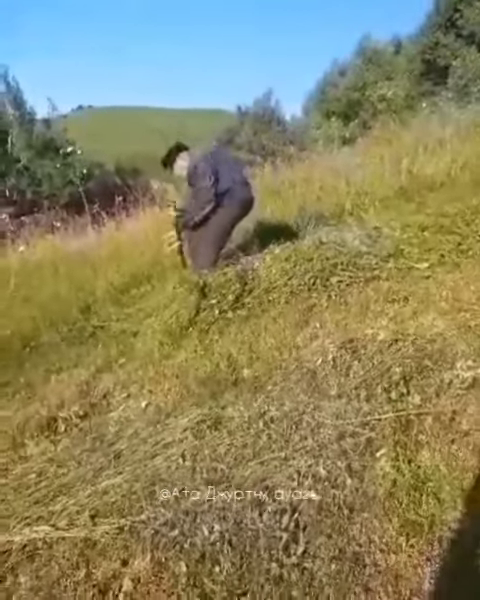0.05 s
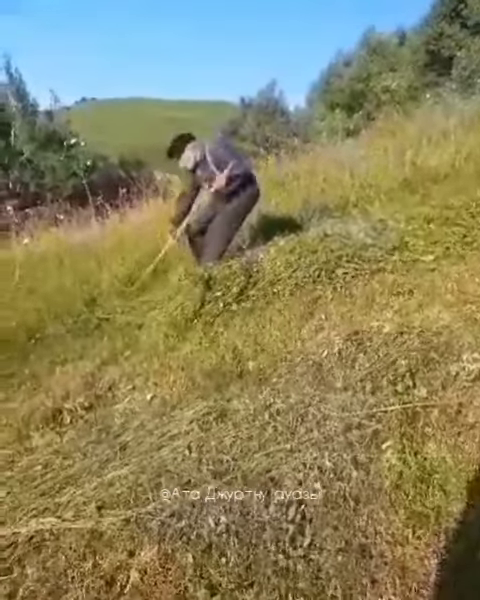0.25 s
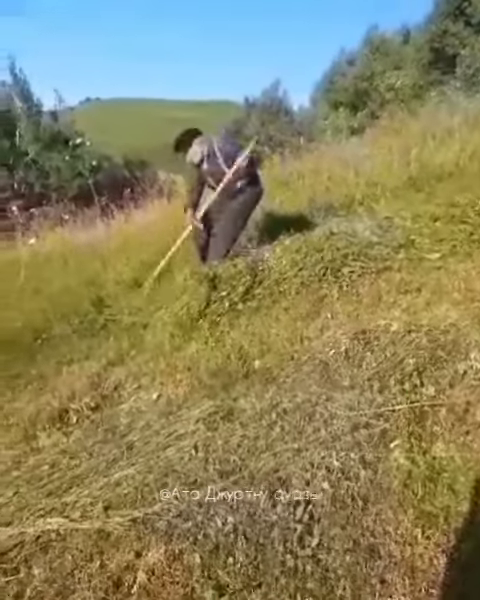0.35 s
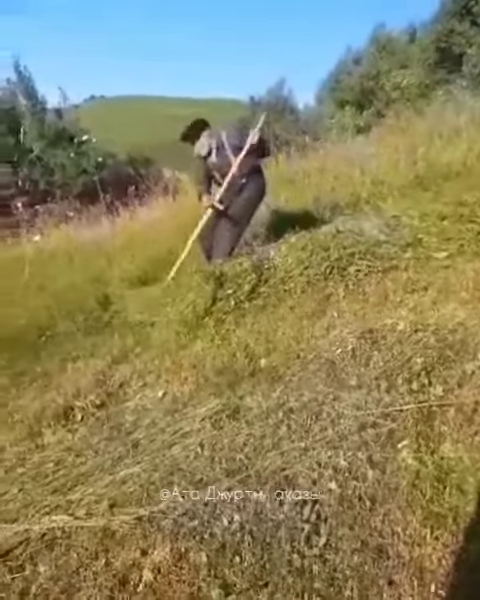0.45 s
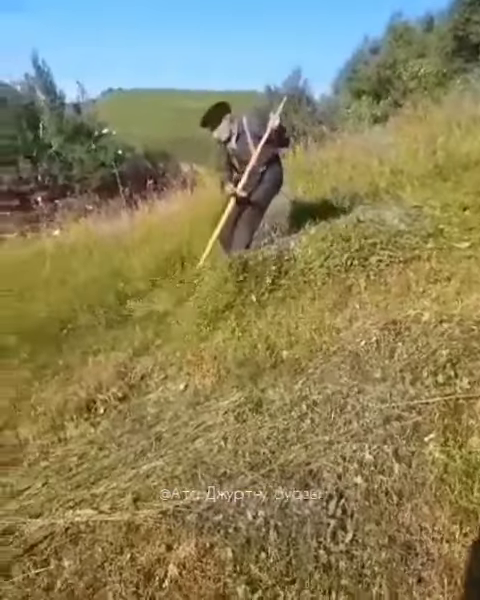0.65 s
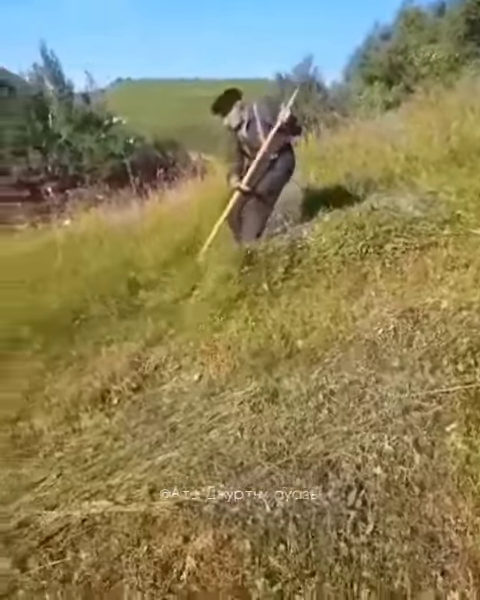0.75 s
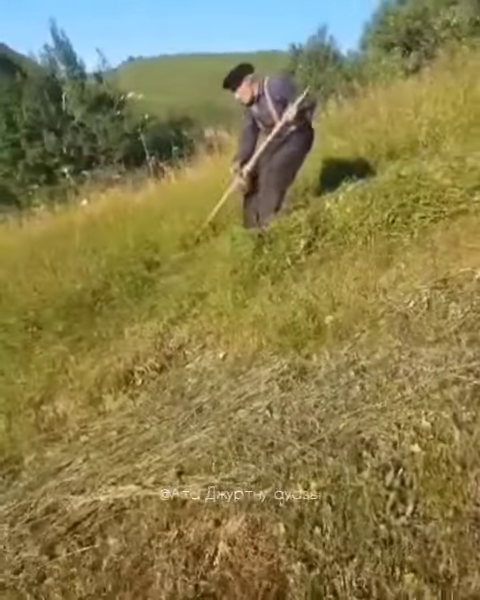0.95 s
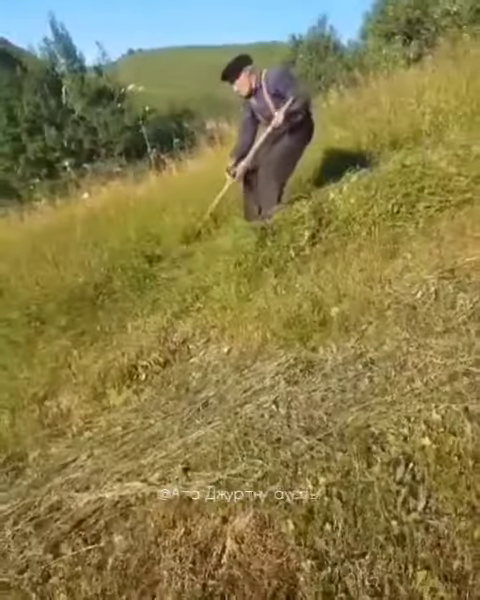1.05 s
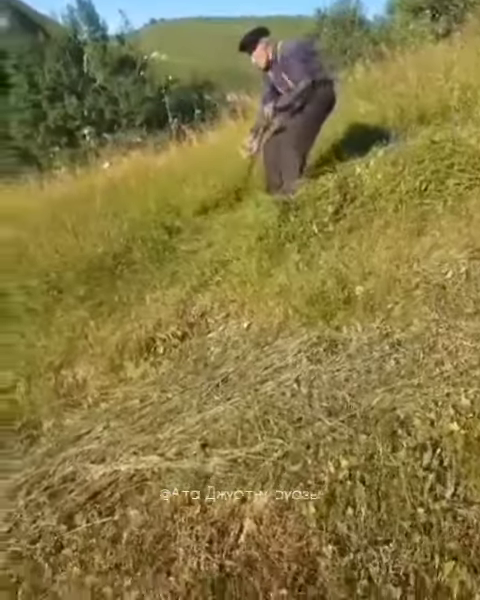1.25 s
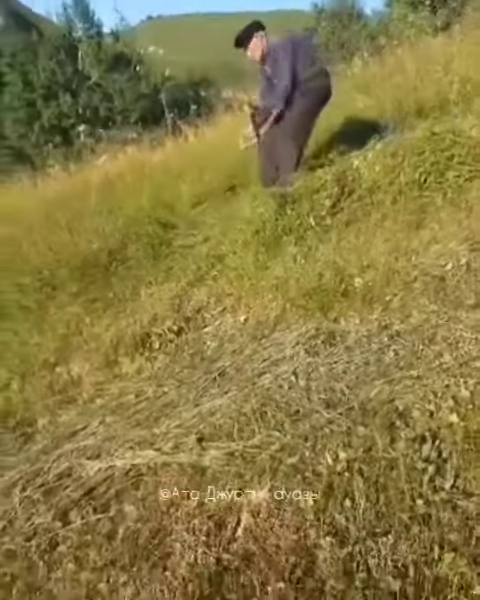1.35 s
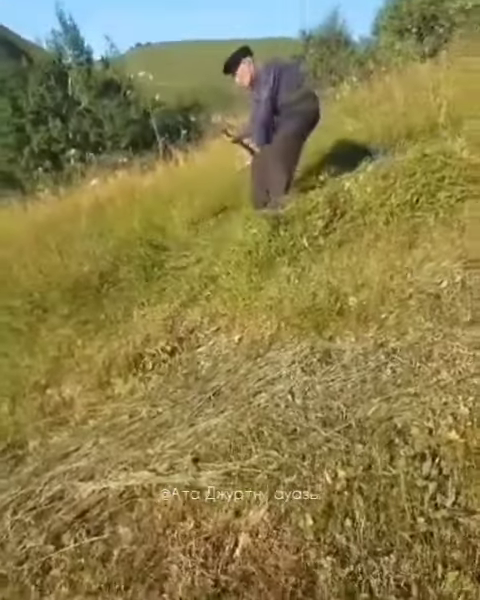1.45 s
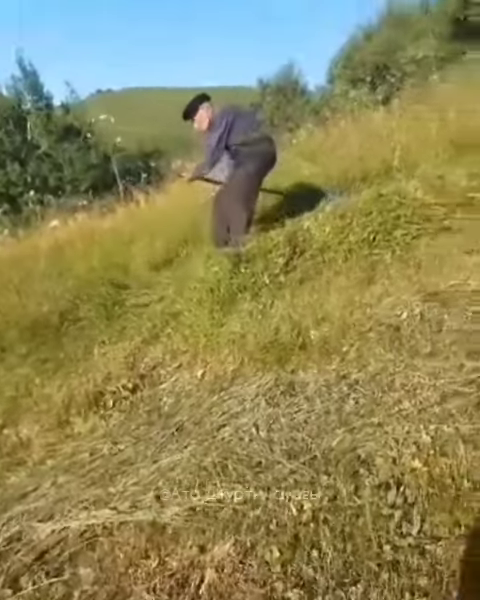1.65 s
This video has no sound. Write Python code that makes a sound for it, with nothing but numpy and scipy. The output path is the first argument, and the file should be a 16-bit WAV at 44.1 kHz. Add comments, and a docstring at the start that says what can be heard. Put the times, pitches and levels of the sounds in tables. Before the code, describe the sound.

A scythe swishes once through tall grass, with wind buffeting the microphone.

```python
"""One scythe stroke through tall grass, heard from a stereo microphone on a breezy hillside.
The blade snaps hundreds of stalks, rings faintly with them and slides back over the stubble.
Nearer by, mostly to the right, dry grass rustles, stems crack and a foot shifts in the straw.
Gusts buffet the microphone, mostly its right port, over the far rush of the valley and a faint hum."""
import sys
import numpy as np
from scipy import signal
from scipy.fft import rfft, irfft
from scipy.io import wavfile
from scipy.ndimage import uniform_filter1d, map_coordinates

SR = 44100
rng = np.random.default_rng(int(sys.argv[2]) if len(sys.argv) > 2 else 0)


def generate_wav(sig):
    """Save sig (samples, or channels by samples) to the path in sys.argv[1] as 16-bit PCM at SR."""
    pcm = np.round(np.clip(np.atleast_2d(sig).T, -1, 1) * 32767).astype(np.int16)
    wavfile.write(sys.argv[1], SR, pcm)


N = 74970
TIME = np.arange(N) / SR
BIN_HZ = np.fft.rfftfreq(N, 1 / SR)


def from_db(db):
    """Decibels to gain."""
    return 10 ** (np.asarray(db) / 20)


def rms_one(x):
    """Scale to unit power."""
    return x / np.sqrt(np.mean(x ** 2) + 1e-20)


def in_time(rows):
    """Each column of a curve at every sample."""
    times, *columns = np.transpose(rows)
    return [np.interp(TIME, times, column) for column in columns]


def per_bin(points):
    """A table over log frequency, read at every spectral bin."""
    hz, value = np.transpose(points)
    return np.interp(np.log(BIN_HZ + 1), np.log(hz), value)


def colour(x, spectrum):
    """Give a signal a smooth spectrum; unit power."""
    return rms_one(irfft(rfft(x) * from_db(per_bin(spectrum)), N))


def pan(db):
    """Left and right gains of constant power; positive dB is to the left."""
    gains = from_db(np.array([[.5], [-.5]]) * db)
    return gains / np.sqrt(np.mean(gains ** 2, axis=0))


def drift(hz):
    """A random wander, mostly slower than hz; unit spread."""
    return rms_one(irfft(rfft(rng.standard_normal(N)) / (1 + (BIN_HZ / hz) ** 2), N))


def swell(s, width_s):
    """A bell-shaped rise and fall."""
    return np.exp(-.5 * ((TIME - s) / width_s) ** 2)


def grains(per_s, spread_db, hiss_db):
    """Tiny fractures of uneven size over the hiss of rubbing leaves; two unrelated signals."""
    sizes = from_db(spread_db * np.minimum(rng.exponential(1, N), 4))
    clicks = (rng.random(N) < per_s / SR) * sizes * rng.standard_normal((2, N))
    return rms_one(rms_one(clicks) + from_db(hiss_db) * rng.standard_normal((2, N)))


def resonate(x, hz, width_hz):
    """One resonance; unit power."""
    r = np.exp(-np.pi * width_hz / SR)
    return rms_one(signal.lfilter([1, 0, -1], [1, -2 * r * np.cos(2 * np.pi * hz / SR), r * r], x))


# how alike the microphone's two ports hear airborne sound: f/Hz, likeness (0-1)
PORT_LIKENESS = [(60, 0.62), (300, 0.82), (600, 1), (1300, 0.32), (2000, 0.43), (2700, 0.34), (4400, 0.8),
                 (5800, 0.67), (7500, 0.17), (10000, 0.11), (12100, 0.36), (14500, 0.32)]
# how far the left port leads: f/Hz, phase/rad
LEFT_LEAD = [(300, 0.046), (700, 0.94), (1200, 0.91), (2000, 0.062), (3100, 3.4), (4400, 4.14),
             (5800, 5.44), (6600, 6.6), (9300, 14.8), (12100, 19.6), (13000, 17.3), (15500, 25.7)]

def at_ports(pair):
    """Two unrelated signals become left and right, as alike and out of step as the ports hear them."""
    alike = np.clip(per_bin(PORT_LIKENESS), 0, 1)
    mid, side = rfft(pair)
    sign = np.array([[1], [-1]])
    ports = np.sqrt((1 + alike) / 2) * mid + np.sqrt((1 - alike) / 2) * side * sign
    return irfft(ports * np.exp(.5j * sign * per_bin(LEFT_LEAD)), N)


# spectrum of the valley from the hillside: f/Hz, level/dB
VALLEY_SPECTRUM = [(30, -30), (100, -2), (200, -27.5), (300, -6), (400, -2.5), (600, -5), (800, -5),
                   (1100, -10.5), (1700, -15), (4000, -18), (15000, -35)]
# its rise and fall: t/s, level/dB
VALLEY_LEVEL = [(0, -43), (.15, -40), (.6, -39), (1.0, -40.5), (1.18, -36), (1.26, -39), (1.305, -33),
                (1.36, -37.5), (1.7, -40.5)]

def valley():
    """Far off, a dull rush of air in the trees."""
    air = at_ports(rng.standard_normal((2, N)))
    return from_db(in_time(VALLEY_LEVEL)[0]) * colour(air, VALLEY_SPECTRUM)


# swells of the hum's lowest band: t/s, level/dB
HUM_LEVEL = [(0, -88), (.35, -41.5), (.55, -38.5), (1.0, -66), (1.19, -38.5), (1.45, -44), (1.6, -42),
             (1.7, -50)]
# faint steady bands above it: f/Hz, width/Hz, level/dB
HUM_BANDS = [(640, 35, -55), (727, 33, -51), (821, 23, -49), (972.5, 26, -57.5)]

def hum():
    """A faint hum, dead centre: narrow, wavering bands of noise."""
    upper = sum(from_db(db) * resonate(rng.standard_normal(N), hz, width) for hz, width, db in HUM_BANDS)
    low = resonate(rng.standard_normal(N), hz=387, width_hz=52)
    return from_db(in_time(HUM_LEVEL)[0]) * low + upper


# wind on the exposed right port: t/s, level/dB
RIGHT_GUSTS = [(0, -61), (.04, -29.5), (.085, -51), (.12, -29), (.175, -52), (.22, -35), (.25, -43),
               (.275, -25), (.305, -35), (.355, -33), (.39, -40), (.425, -24.5), (.49, -34.5), (.52, -18.5),
               (.585, -16), (.66, -14.5), (.68, -32), (.712, -24), (.735, -14.5), (.81, -12), (.91, -15.5),
               (.98, -9.5), (1.025, -14.5), (1.066, -5), (1.11, -12.5), (1.19, -18), (1.24, -26.5),
               (1.26, -13), (1.32, -14), (1.375, -23.5), (1.41, -20), (1.46, -27.5), (1.55, -35),
               (1.605, -26.5), (1.64, -38), (1.7, -32)]
# wind on the sheltered left port: t/s, level/dB
LEFT_GUSTS = [(0, -65), (.2, -53), (.35, -21.5), (.42, -41), (.75, -55), (.86, -25), (.95, -39),
              (1.06, -47), (1.35, -46), (1.5, -62), (1.7, -54)]
# the flow breaks off for an instant at both ports: t/s, depth/dB
LULLS = [(0.548, 9), (.632, 1), (0.79, 16), (.908, 4), (1.022, 3.5), (1.097, 12), (1.176, 8), (1.306, 11),
         (1.469, 8)]
# spectrum of eddies passing at EDDY_REFERENCE_HZ: f/Hz, level/dB
EDDY_SPECTRUM = [(20, -50), (35, -53), (50, -16), (70, -2), (112, -0.5), (140, -14.5), (175, -18.5),
                 (220, -29.5), (300, -35), (600, -67), (2000, -81)]
# how fast the eddies pass the ports: t/s, f/Hz
EDDY_RATE = [(0, 83.2), (.2, 74.8), (.34, 88.6), (.45, 68.7), (.54, 92.9), (.8, 93.54), (.97, 98.66),
             (1.065, 111.9), (1.17, 92.15), (1.28, 91.1), (1.4, 71.8), (1.6, 89.6), (1.7, 71)]
# spectrum of the fine turbulence: f/Hz, level/dB
TURBULENCE_SPECTRUM = [(100, 2), (190, 1.5), (280, 3), (420, -14), (1000, -29.5), (3000, -62)]
EDDY_REFERENCE_HZ, EDDY_EVENNESS = 94.95, 0.7   # an evenness of 1 would level out the lumps
TURBULENCE_DB, TURBULENCE_GROWTH = -17.5, 1.63   # at a full-scale gust; dB per dB of wind

def buffet(gusts):
    """Eddies right on one port: a low flutter that breaks into finer turbulence in strong gusts."""
    level_db = in_time(gusts)[0] - sum(depth_db * swell(s, width_s=0.0055) for s, depth_db in LULLS)
    eddies = signal.hilbert(colour(rng.standard_normal(N), EDDY_SPECTRUM))
    strength = np.sqrt(uniform_filter1d(np.abs(eddies) ** 2, size=700))
    evened = rms_one(eddies.real / strength ** EDDY_EVENNESS)
    travel = np.cumsum(in_time(EDDY_RATE)[0] / EDDY_REFERENCE_HZ)
    flutter = map_coordinates(evened, [travel], order=1, mode="mirror")
    turbulence = colour(rng.standard_normal(N), TURBULENCE_SPECTRUM)
    return from_db(level_db) * flutter + from_db(TURBULENCE_DB + TURBULENCE_GROWTH * level_db) * turbulence


# course of the nearby rustle: t/s, relative level/dB, left-right/dB
RUSTLE = [(0, -51.5, 5), (.09, -44.5, 2), (.14, -37.5, 6), (.2, -42.5, 0), (.45, -39.5, 6.5),
          (.575, -40.5, -11), (.63, -45, -14), (.71, -43.5, -3.5), (.82, -40, 0), (.97, -37, 1),
          (1.06, -40, 0), (1.14, -43.5, -5.5), (1.22, -49, -7), (1.25, -43, -5), (1.32, -44.5, -3),
          (1.41, -44.5, -5.5), (1.49, -42.5, -8), (1.7, -42.5, -11)]
# its balance between the ports: f/Hz, left-right/dB
RUSTLE_BALANCE = [(1000, -6), (3000, -6), (8000, 3), (11000, 1.5), (14000, -5)]
# spectrum of the nearby rustle as heard, with a dip near 7 kHz: f/Hz, level/dB
RUSTLE_SPECTRUM = [(150, 7), (600, 8), (1500, 0.5), (2400, 0.5), (4200, 5.5), (5500, 1), (7200, -0.5),
                   (8700, 6), (10200, 1.5), (12700, 4.5), (15200, 3), (15800, -1)]
RUSTLE_GAIN_DB, RUSTLE_FLUTTER_DB = 6, 1

def dry_grass():
    """Near the microphone, tiny fractures in dry grass make a fine crackling rustle."""
    level_db, side_db = in_time(RUSTLE)
    crackle = at_ports(grains(per_s=1300, spread_db=4.5, hiss_db=9))
    crackle = irfft(rfft(crackle) * pan(per_bin(RUSTLE_BALANCE)), N)
    gain = from_db(RUSTLE_GAIN_DB + level_db + RUSTLE_FLUTTER_DB * drift(hz=24.8))
    return gain * pan(side_db) * colour(crackle, RUSTLE_SPECTRUM)


# single stems break: t/s, level/dB, left-right/dB
CRACKS = [(1.0432, -23.5, -7), (1.2361, -32, -8), (1.568, -18.5, -8), (1.5713, -23.5, -19)]
# spectrum of a crack: f/Hz, level/dB
CRACK_SPECTRUM = [(500, -7), (2500, -9), (4500, -2.5), (6000, -6), (9000, 0.5), (14000, 0)]

def stem_cracks(decay_s=0.0015):
    """Nearby on the right, each breaking stem is a bright burst that dies at once."""
    bursts = sum(from_db(db) * pan(side_db) * (TIME >= s) * np.exp(-np.abs(TIME - s) / decay_s)
                 for s, db, side_db in CRACKS)
    return bursts * colour(rng.standard_normal((2, N)), CRACK_SPECTRUM)


# crunches underfoot: t/s, width/s, level/dB, left-right/dB, rasp f/Hz, rasp re straw/dB
CRUNCHES = [(1.515, 0.0096, -36.5, -4, 4200, 2.5), (1.548, 0.0076, -39.5, -3, 2227, -8),
            (1.582, 0.0035, -42, -10, 1564, 0), (1.61, 0.03, -36.5, -9, 4250, -10),
            (1.688, 0.014, -40.5, -12, 3546, -16)]
# spectrum of the crunches as heard: f/Hz, level/dB
STRAW_SPECTRUM = [(200, -4), (600, 5), (1600, 8.5), (2900, 7), (4200, -4.5), (6000, 4.5), (8300, 6.5),
                  (10300, 0), (13000, 11), (15500, -5)]
STRAW_LAG_S, STRAW_DIRECT = 0.00048, 0.81   # at the left port: delay; amplitude share arriving directly

def foot_in_straw():
    """Close by on the right, straw crackles under a shifting foot; each crunch rasps at its own pitch."""
    right, scattered = grains(per_s=2500, spread_db=1, hiss_db=7)
    delayed = np.roll(right, round(STRAW_LAG_S * SR))
    left = STRAW_DIRECT * delayed + np.sqrt(1 - STRAW_DIRECT ** 2) * scattered
    straw = colour(np.array([left, right]), STRAW_SPECTRUM)
    out = 0
    for s, width_s, db, side_db, hz, rasp_db in CRUNCHES:
        rasp = from_db(rasp_db) * resonate(straw, hz, width_hz=820)
        out += from_db(db) * pan(side_db) * swell(s, width_s) * (straw + rasp)
    return out


# the blade drags over the stubble: t/s, level/dB
DRAG_LEVEL = [(0, -76), (.42, -43), (.54, -46), (.66, -41), (.75, -45), (.97, -43), (1.21, -49), (1.3, -42),
              (1.39, -46.5), (1.48, -48), (1.7, -57)]

def backswing():
    """Well to the right, the blade, damped by the stubble, scrapes softly on its way back."""
    scrape = resonate(rng.standard_normal((2, N)), hz=2404, width_hz=310)
    return from_db(in_time(DRAG_LEVEL)[0]) * pan(db=-13) * scrape


# tufts give way: t/s, width/s, level/dB, f/Hz
THUDS = [(0.14, 0.018, -40.5, 850), (0.226, .012, -36.5, 950), (0.255, 0.012, -37.5, 396),
         (0.278, 0.012, -33, 760), (0.309, 0.017, -33.5, 223), (0.357, 0.01, -29.5, 720),
         (0.4, 0.014, -33.5, 850)]

def swath(width_oct=0.61):
    """The swath is pushed aside, each tuft with a soft thud at its own pitch."""
    octaves = np.log2(BIN_HZ + 1)
    noise = rfft(at_ports(rng.standard_normal((2, N))))
    out = 0
    for s, width_s, db, hz in THUDS:
        band = np.exp(-.5 * ((octaves - np.log2(hz)) / width_oct) ** 2)
        out += from_db(db) * swell(s, width_s) * rms_one(irfft(noise * band, N))
    return out


# the blade's ringing modes: f/Hz, width/Hz, relative level/dB
BLADE_MODES = [(1671, 24, -15), (2015, 22, -9), (2038, 12, -7), (2277, 36, 0.5), (2490, 82, 6),
               (2726, 42, -4), (2760, 49, -9), (5510, 20, -1), (5797, 22, -6), (9020, 18, -6),
               (9370, 20, -1), (12700, 18, -9)]
BLADE_PAN_DB = -5   # right of centre

def blade_ring():
    """Scraping stalks keep the blade's modes ringing; unit power."""
    scrape = at_ports(rng.standard_normal((2, N)))
    return rms_one(sum(from_db(db) * resonate(scrape, hz, width) for hz, width, db in BLADE_MODES))


# tough stems strike: t/s, level before the envelope/dB, centre of the ringing modes f/Hz
KNOCKS = [(.264, -21.5, 2250), (.286, -26, 1820), (.308, -26, 2760), (.347, -27, 2110), (.398, -32, 2508)]

def blade_knocks(attack_s=0.0066, decay_s=0.018, width_oct=0.095):
    """Tough stems knock the passing edge; where each one hits decides which of the blade's modes sing."""
    mode_hz = np.array(BLADE_MODES)[:, :1]
    start_turns = rng.random((len(KNOCKS), len(BLADE_MODES), 1))
    out = 0
    for (s, db, centre_hz), turns in zip(KNOCKS, start_turns):
        age = np.maximum(TIME - s, 0)
        shares = np.exp(-.5 * (np.log2(mode_hz / centre_hz) / width_oct) ** 2)
        modes = rms_one(np.sum(shares * np.sin(2 * np.pi * (mode_hz * age + turns)), axis=0))
        envelope = (1 - np.exp(-age / attack_s)) * np.exp(-age / decay_s)
        out += from_db(db) * envelope * modes
    return out * pan(BLADE_PAN_DB)


# force of the cut: t/s, relative level/dB
STROKE_FORCE = [(0, -47), (.06, -52), (.14, -42.5), (.19, -37), (.245, -31), (.297, -26.5), (.35, -26),
                (.44, -30), (.52, -39.5), (.68, -42), (.9, -66)]
# spectrum of snapping stalks: f/Hz, level/dB
STALK_SPECTRUM = [(60, 4), (200, 6), (400, 2), (800, 0), (1350, -2), (2200, 0.5), (3400, 3.5), (4400, -0.5),
                  (5700, -1.5), (7300, -1), (9100, 0.5), (10300, -1.5), (12300, 0.5), (15200, -2),
                  (15800, -11)]
CUT_GAIN_DB, RING_GAIN_DB, BITE_DB, CUT_FLUTTER_DB = 3, -4, -30, 1
TIP_LAG_S, TIP_CROSSOVER_HZ = 0.018, 6500

def scythe():
    """Stalks snap along the edge and shake the blade; their falling tops sizzle just after."""
    force = from_db(in_time(STROKE_FORCE)[0] + CUT_FLUTTER_DB * drift(hz=32))
    fractures = at_ports(grains(per_s=3500, spread_db=1.5, hiss_db=1))
    snaps = colour(fractures, STALK_SPECTRUM)
    rasp = irfft(rfft(snaps) / (1 + (BIN_HZ / TIP_CROSSOVER_HZ) ** 2), N)
    sizzle = snaps - rasp
    cut = force * rasp + np.interp(TIME - TIP_LAG_S, TIME, force) * sizzle
    ring = from_db(RING_GAIN_DB) * force * blade_ring()
    grating = resonate(at_ports(rng.standard_normal((2, N))), hz=2030, width_hz=920)
    bite = from_db(BITE_DB) * swell(s=0.297, width_s=0.031) * grating   # the edge enters the grass
    return from_db(CUT_GAIN_DB) * cut + (ring + bite) * pan(BLADE_PAN_DB)


def scene():
    """The hillside from where the microphone stands: wind, mowing, nearby grass and the distance."""
    wind = np.array([buffet(LEFT_GUSTS), buffet(RIGHT_GUSTS)])
    mowing = scythe() + blade_knocks() + backswing() + swath()
    nearby = dry_grass() + foot_in_straw() + stem_cracks()
    return valley() + hum() + wind + nearby + mowing


def record(dry, bass_cut_hz=47.4, top_cut_hz=15600):
    """The microphone drops the deepest bass; the top is cut steeply."""
    heard = signal.sosfilt(signal.butter(2, bass_cut_hz, "high", fs=SR, output="sos"), dry)
    return signal.sosfilt(signal.ellip(16, .1, 90, top_cut_hz, fs=SR, output="sos"), heard)


dry = scene()
out = record(dry)
generate_wav(out)
```